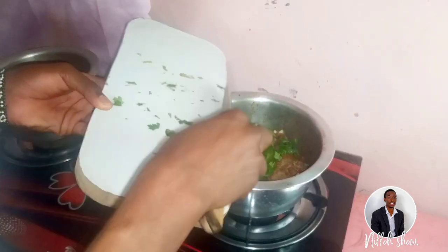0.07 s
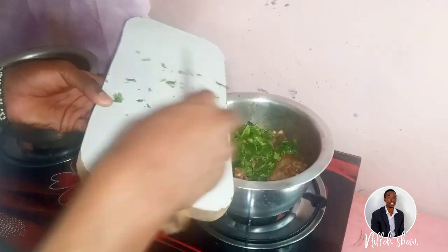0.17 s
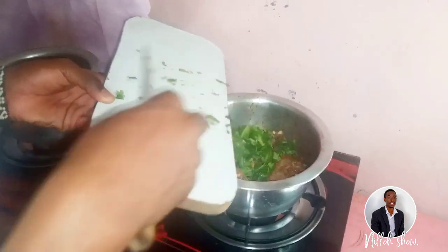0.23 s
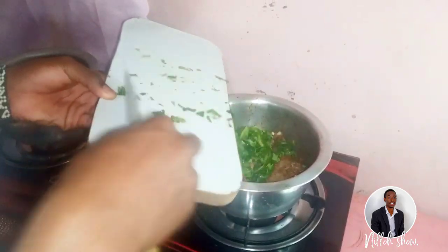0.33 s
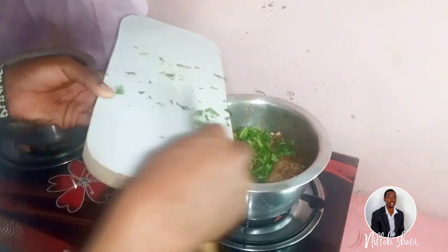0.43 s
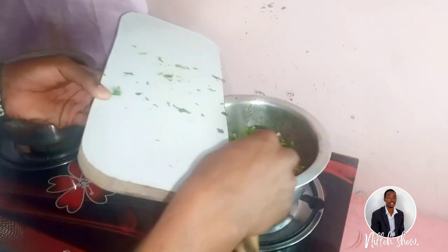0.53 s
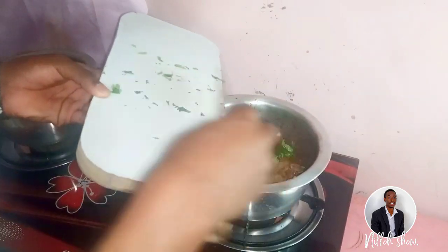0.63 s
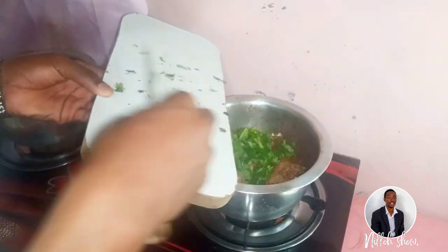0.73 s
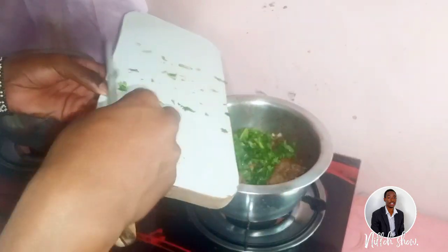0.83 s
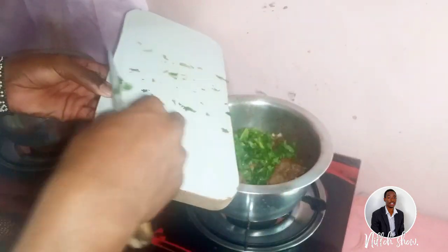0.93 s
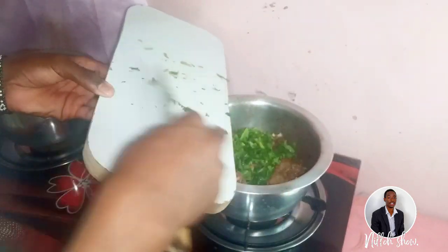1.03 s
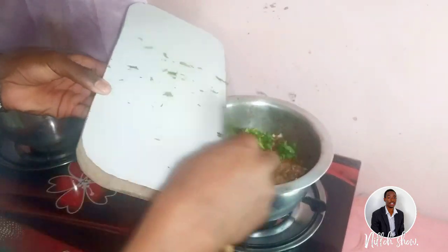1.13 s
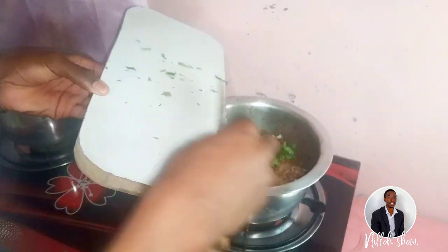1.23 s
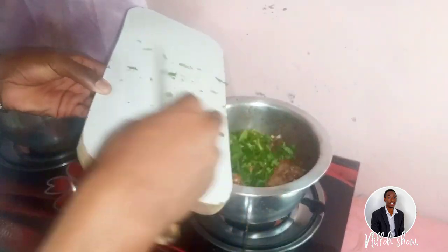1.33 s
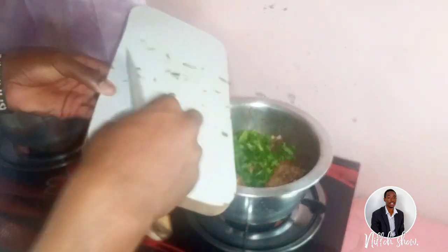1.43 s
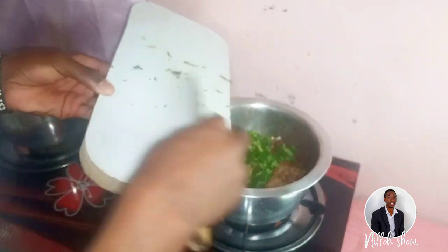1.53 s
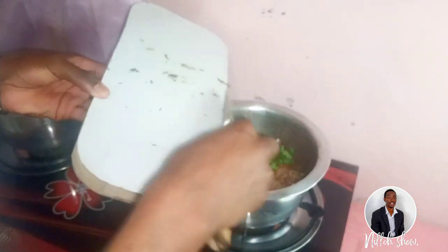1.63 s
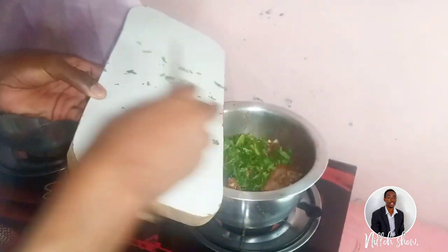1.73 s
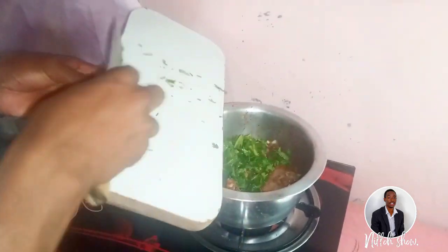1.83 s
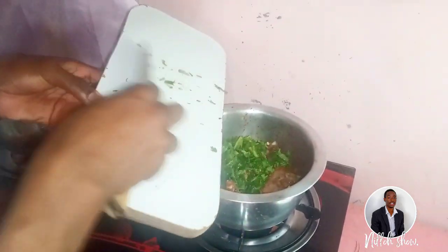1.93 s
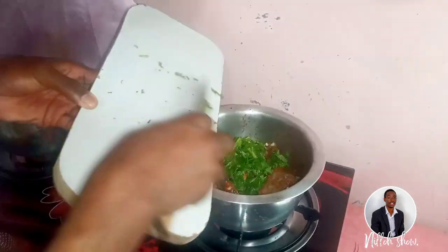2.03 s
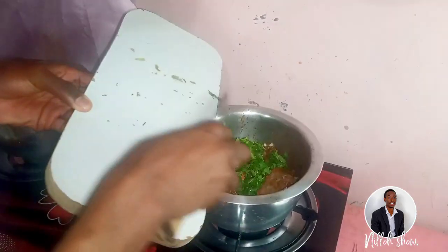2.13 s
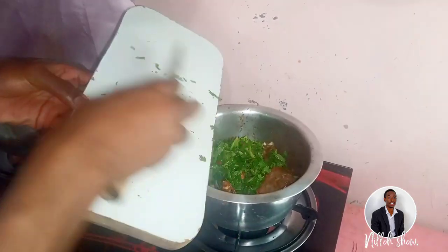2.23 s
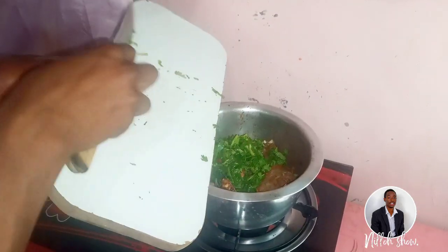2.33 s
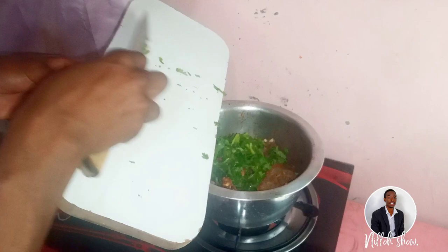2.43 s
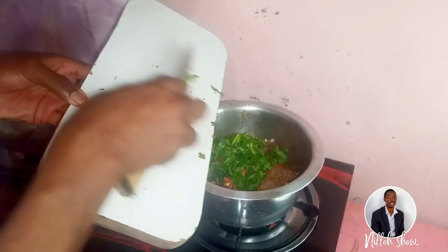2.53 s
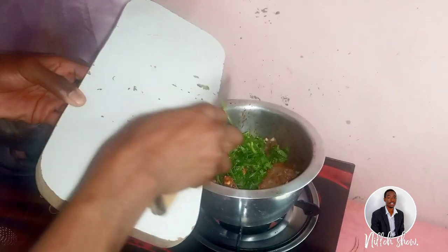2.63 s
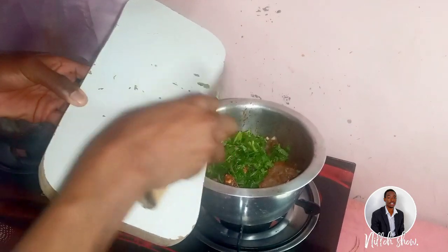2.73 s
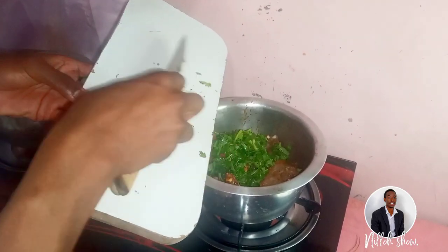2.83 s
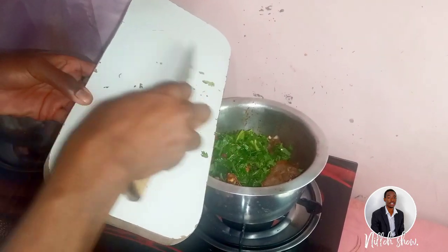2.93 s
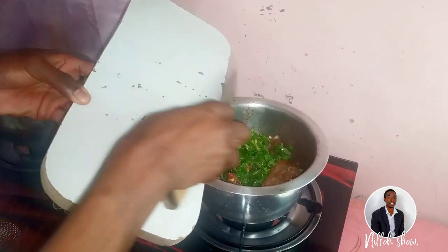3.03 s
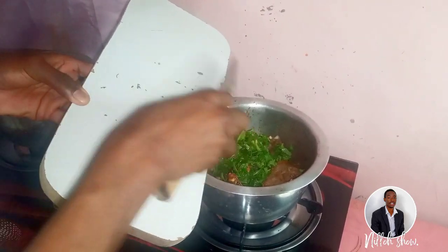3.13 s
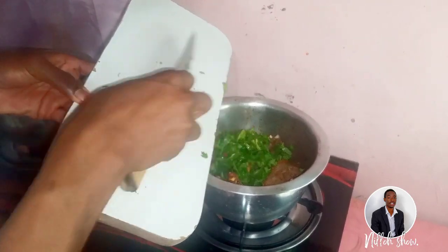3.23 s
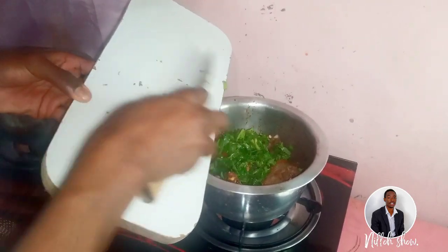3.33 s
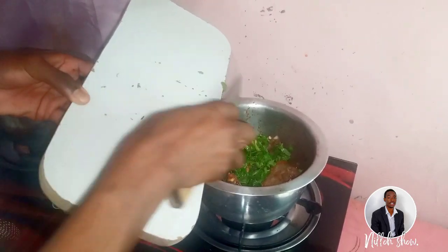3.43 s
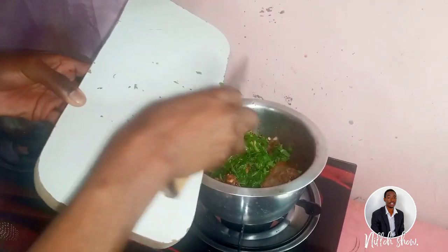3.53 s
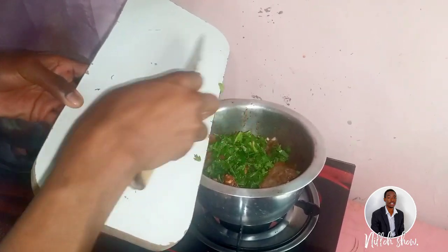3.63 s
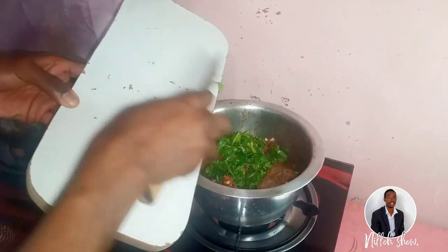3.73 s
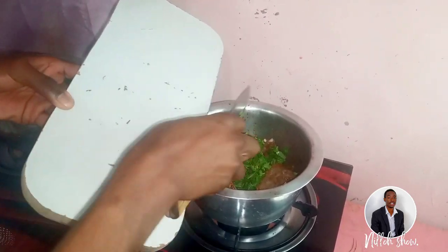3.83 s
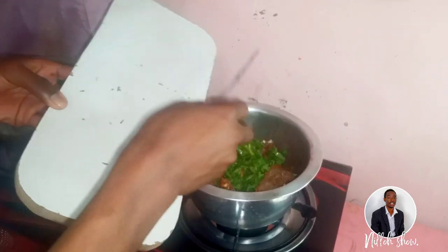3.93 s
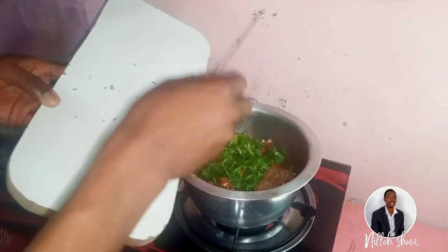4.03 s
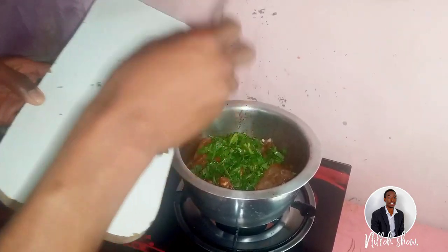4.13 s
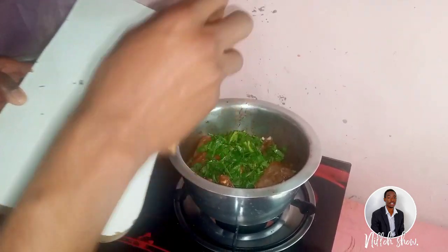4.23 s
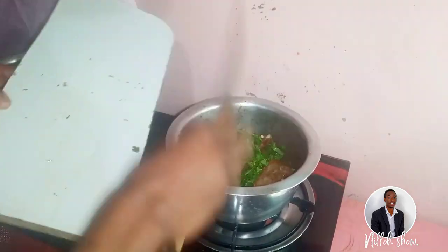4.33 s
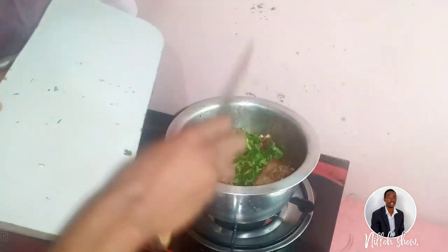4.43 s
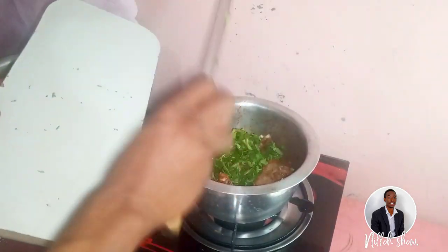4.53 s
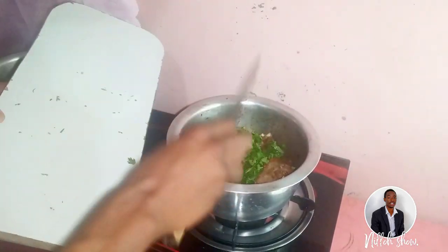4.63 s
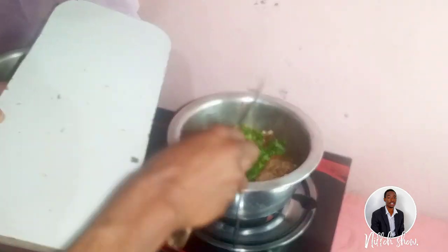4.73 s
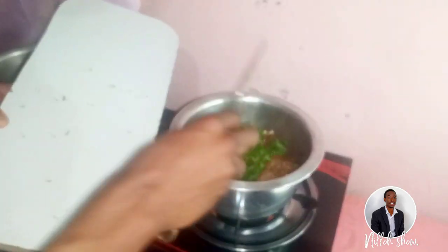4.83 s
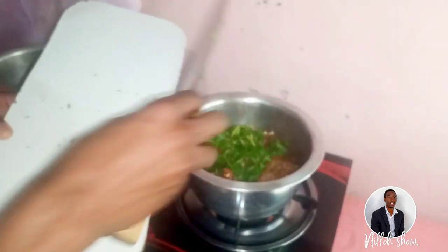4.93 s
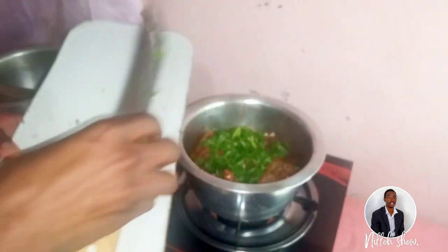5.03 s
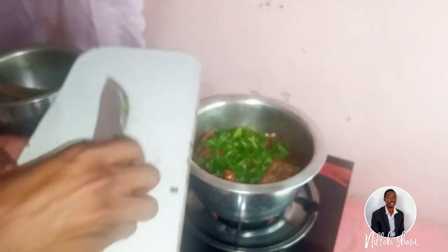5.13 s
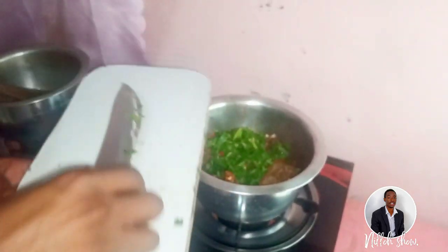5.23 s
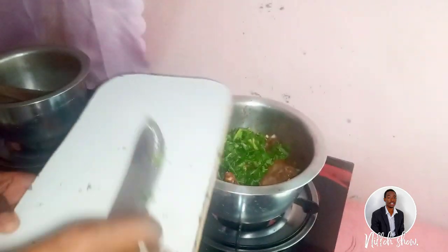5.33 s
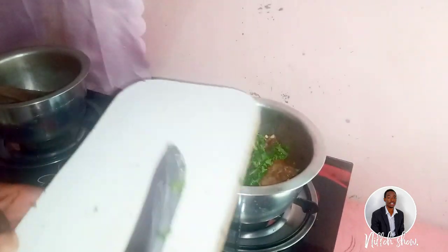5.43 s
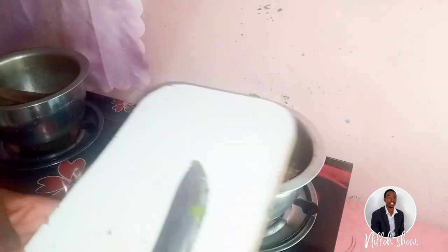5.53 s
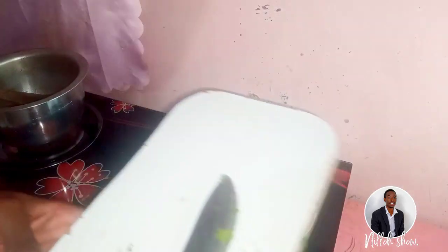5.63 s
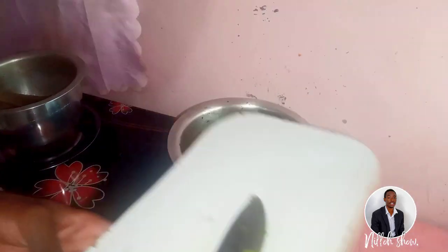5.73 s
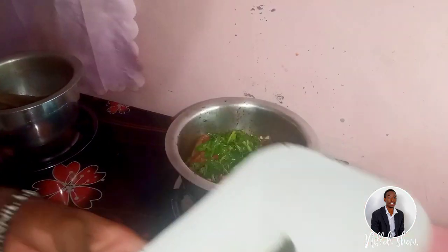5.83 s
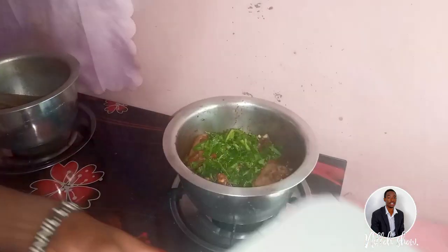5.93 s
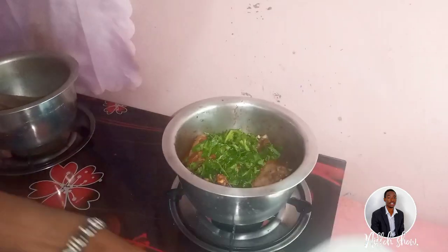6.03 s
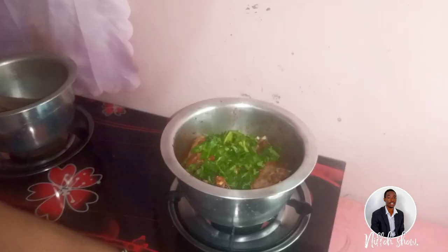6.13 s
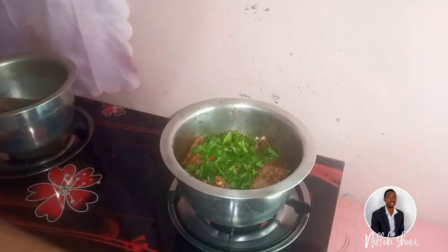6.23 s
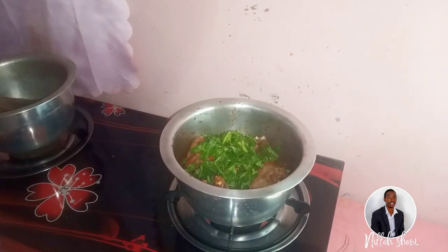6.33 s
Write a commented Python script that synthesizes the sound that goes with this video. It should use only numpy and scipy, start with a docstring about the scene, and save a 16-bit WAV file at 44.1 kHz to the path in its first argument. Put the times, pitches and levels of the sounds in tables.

```python
"""Knife scraping herbs off a chopping board

A knife lands on a plastic board eight times and scrapes herbs off it into a steel pot. Random slips of
the edge ring the board and blade; each landing is a crack, a short note and a low push.
The scrapes, landings and lift-offs also ring the pot. Later the flat blade claps on the board amid soft bumps.
A faint frying wash with pops runs throughout. A short room tail follows the knife, board and pot,
and a gain control turns loud moments down."""
import sys
import numpy as np
from scipy import signal
from scipy.fft import rfft
from scipy.io import wavfile
from scipy.ndimage import uniform_filter1d, map_coordinates

SR = 44100
rng = np.random.default_rng(int(sys.argv[2]) if len(sys.argv) > 2 else 0)


def file_out(sig):
    """Save sig as 16-bit WAV at sys.argv[1]."""
    # one column per channel
    cols = np.atleast_2d(sig).T
    # limit, then scale
    lim = np.clip(cols, -1, 1)
    pcm = np.round(lim * 32767).astype(np.int16)
    wavfile.write(sys.argv[1], SR, pcm)


N = 280917  # length of the scene in samples

# the blade slides over the board: (start [s], length [s], board rasp [dB], blade singing [dB],
# edge hiss [dB], edge whistle [dB], edge squeak [dB], ring of the freed blade [dB],
# hesitation at the start relative to the slowing at the end [ratio], fastest point [share of the length],
# pitch favoured by the contact point at the start [Hz], at the end [Hz])
STROKES = [(-0.1, 0.11, -41.5, -35, -39, -42, -51, -49, 1.3, 0.32, 1685, 1800),
           (0.386, 0.18, -31.5, -30.5, -33.5, -35, -52, -50, 1.73, 0.52, 1490, 2000),
           (0.9696, 0.21, -30.5, -29, -29.5, -37.5, -40, -38, 1.66, 0.62, 1660, 1740),
           (1.479, 0.15, -36.5, -27.5, -30, -37, -38, -34, 1.44, 0.41, 1960, 1730),
           (1.92, 0.17, -35.5, -31, -30.5, -37, -45, -45, 1.5, 0.66, 1890, 1840),
           (2.43, 0.25, -33.5, -29.5, -33.5, -44.5, -48.5, -38.5, 1.17, 0.52, 1540, 1740),
           (2.958, 0.12, -33, -29.5, -36.5, -48, -55, -47, 1.3, 0.76, 1570, 1670),
           (3.341, 0.1, -37.5, -37.5, -40, -45, -52, -50, 1.13, 0.97, 1500, 1420),
           (3.756, 0.037, -37, -39, -40, -52, -54, -47, 0.95, 1, 1580, 1870)]
# modes of the freely ringing board: (pitch [Hz], relative level [dB], t60 [s])
BOARD_MODES = [(233, 0, 0.2), (310.9, 2, 0.25), (439, -4, 0.046), (438, 4, 0.022), (450.5, -4.5, 0.15),
               (753, -6.5, 0.23), (788, 3, 0.15), (841.6, -6.5, 0.14), (895, -2.5, 0.16), (1013, 0, 0.09),
               (1080, -13, 0.14), (1257, -3, 0.12)]
# modes of the blade before further damping: (pitch [Hz], relative level [dB], t60 [s])
BLADE_MODES = [(1460, 0, 0.1), (1535, -8, 0.054), (1846, -8, 0.06), (1811, -0.5, 0.067), (1840, 0, 0.02),
               (2050, -7, 0.1), (2323, -4.5, 0.046), (2375, -12, 0.031), (2908, -3, 0.06)]
# thin ring of the edge: (pitch [Hz], relative level [dB], t60 [s])
EDGE_MODES = [(3610, 0.5, 0.019), (3900, -6, 0.029), (4170, -7, 0.014), (4864, -6, 0.06), (5230, -8, 0.014),
              (5590, -2, 0.022)]
# highest modes of the edge, which squeak under a hard stroke: (pitch [Hz], relative level [dB], t60 [s])
SQUEAK_MODES = [(10400, -3, 0.014), (10800, -1, 0.024), (11440, -6, 0.013)]
# spectrum of the board's rasp: (frequency [Hz], relative level [dB])
RASP_SPECTRUM = [(100, -67), (300, -19.5), (560, -29), (760, 1), (1050, 4), (1330, -17), (2000, -2),
                 (8000, -44)]
# spectrum of the blade's gritty sound: (frequency [Hz], relative level [dB])
GRIT_SPECTRUM = [(800, -44.5), (1330, -9), (1490, 8.5), (1670, -0.5), (1860, -4), (2150, -3), (2380, 1.5),
                 (2620, -14.5), (2950, 0), (3250, -4), (5000, -31.5), (8000, -55)]
# spectrum of the edge's hiss: (frequency [Hz], relative level [dB])
HISS_SPECTRUM = [(800, -34), (2000, -23), (2600, 0), (2950, 10.5), (3250, 2), (3650, 7), (3900, 7.5),
                 (4180, 7.5), (4800, 8), (5700, 7), (6130, 2.5), (6500, 3.5), (7200, -4), (9200, -5.5),
                 (10900, -7), (12500, -9), (15500, 0)]
# level change where a stroke is slow, compared with its fastest point (dB)
SLOW_BOARD_DB, SLOW_BLADE_DB, SLOW_HISS_DB, SLOW_WHISTLE_DB = 0.5, -4.5, -10.5, -17.5
BITE_S, LIFT_S = 0.0085, 0.022  # the edge bites, and lifts off at the end
CATCH_DB, CATCH_PER_S = 1.35, 45  # the edge catches and frees itself on cuts and herbs
SNAGS_PER_S, SNAG_DB = 260, -4  # coarse slips over old cuts, relative to the fine rasp
GLANCING_HZ = 650  # a glancing edge hardly bends the board: lower modes stay still
WHISTLE_HZ, WHISTLE_RING_S = 9650, 0.042  # the thin whistle of the edge
BOARD_DRIFT_S, BLADE_DRIFT_S = 0.00131, 0.000805  # typical time by which the cycles run ahead or behind
CROWD_DB = -4.0  # crowd of weak modes, relative to the main modes


def scrapes():
    """Clumped slips of the edge ring board and blade and hiss; each stroke speeds up, then slows down."""
    t, out = np.arange(N) / SR, np.zeros(N)
    path = []
    for s, length, *_, from_hz, to_hz in STROKES:
        path += [(s, from_hz), (s + length, to_hz)]
    favoured_hz = np.interp(t, *np.transpose(path))

    slips = steady(grains(per_s=4000, spread_db=2.2) * amp(2.2 * wander(per_s=300)))
    light = butter(slips, 890, "highpass", order=3)
    snags = steady(grains(per_s=SNAGS_PER_S, spread_db=1.5))
    dense = crowd_of_modes(slips) + amp(SNAG_DB) * snags

    # a glancing edge shortens the board's ring
    stiff = [(hz, db, 0.64 * t60) for hz, db, t60 in BOARD_MODES if hz > GLANCING_HZ]
    board_tones = drifting(rubbed(light, stiff, shift_db=3.5), BOARD_DRIFT_S)
    board = steady(board_tones + amp(CROWD_DB) * unit(through(dense, colour(RASP_SPECTRUM))))
    blade_tones = drifting(rubbed(light, BLADE_MODES, 1.9, favoured_hz), BLADE_DRIFT_S)
    blade = steady(blade_tones + amp(CROWD_DB) * unit(through(dense, colour(GRIT_SPECTRUM))))
    edge_tones = drifting(rubbed(light, EDGE_MODES, shift_db=5), BLADE_DRIFT_S)
    hiss = steady(unit(through(dense, colour(HISS_SPECTRUM))) + amp(-4.5) * edge_tones)

    # two resonances in a row make the whistle
    whistle = through(light, ring([(WHISTLE_HZ, 0, WHISTLE_RING_S)]))
    whistle = steady(through(whistle, ring([(WHISTLE_HZ, 0, WHISTLE_RING_S / 2)])))
    whistle = whistle * amp(5.5 * wander(per_s=40))
    squeak = steady(rubbed(butter(slips, 9000, "highpass", order=4), SQUEAK_MODES, shift_db=5))
    board, blade, hiss = (layer * amp(CATCH_DB * wander(per_s=CATCH_PER_S))
                          for layer in (board, blade, hiss))

    for (s, length, board_db, blade_db, hiss_db, whistle_db, squeak_db, _,
         hesitation, fastest, _, _) in STROKES:
        contact = np.interp(t - s, [0, BITE_S, length, length + LIFT_S], [0, 1, 1, 0])
        # 0 at the fastest point, rising towards both ends
        slow = np.interp(t - s, [0, fastest * length, length + LIFT_S], [-hesitation, 0, 1]) ** 2
        stroke = board * amp(board_db + SLOW_BOARD_DB * slow)
        stroke += blade * amp(blade_db + SLOW_BLADE_DB * slow)
        stroke += hiss * amp(hiss_db + SLOW_HISS_DB * slow)
        thin = whistle * amp(whistle_db) + squeak * amp(squeak_db)
        stroke += thin * amp(SLOW_WHISTLE_DB * slow)
        out += contact * stroke
    return out


PRESSED_RING = 0.89  # share of the given ring time left under the sliding edge


def rubbed(slips, modes, shift_db, favoured_hz=None):
    """The moving contact drives each mode now more, now less; those near the favoured pitch most."""
    out = np.zeros(N)
    for k, (hz, level_db, t60) in enumerate(modes):
        db = shift_db * wander(per_s=22)
        if favoured_hz is not None:
            db = db + 8 * np.exp(-((hz - favoured_hz) / 170) ** 2)
        mode = ring([(hz, level_db, PRESSED_RING * t60)])
        out += through(slips * amp(db), (-1) ** k * mode)  # every other mode is flipped
    return unit(out)


def crowd_of_modes(slips):
    """Three sets of dense echoes come and go, like many weak modes at different places on the blade."""
    crowd = slips
    for _ in range(3):
        presence = np.maximum(wander(per_s=18) + 0.78, 0)
        crowd = crowd + presence * through(slips, scatter(t60=0.078))
    return steady(patchy(drifting(crowd, BLADE_DRIFT_S), hz_wide=230, lasting_s=.04, depth_db=3.3))


def drifting(x, drift_s):
    """Bends all pitches slightly up and down by reading the sound a little early or late."""
    n = np.arange(N)
    return np.interp(n + drift_s * SR * wander(per_s=11), n, x)


def patchy(x, hz_wide, lasting_s, depth_db):
    """Short-lived resonances come and go at random pitches."""
    window, hop = 512, 128  # samples
    z = signal.stft(x, nperseg=window, noverlap=window - hop)[2]
    bins, frames = np.indices(z.shape)
    place = [bins * SR / window / hz_wide, frames * hop / SR / lasting_s]
    field = unit(map_coordinates(rng.standard_normal(z.shape), place, order=1, mode="nearest"))
    return signal.istft(z * amp(depth_db * field), nperseg=window, noverlap=window - hop)[1][:N]


# the edge digs in and chatters on one resonance: (middle [s], length [s], level [dB], pitch [Hz])
CHATTERS = [(.468, 0.073, -29, 831), (0.488, 0.039, -38.5, 4540), (0.561, 0.056, -33.5, 2030),
            (0.529, .08, -35, 2943), (0.56, .04, -33, 964), (1.058, 0.072, -35.5, 3610),
            (1.085, 0.065, -34, 2445), (1.089, 0.035, -27, 1830), (1.114, 0.059, -44, 5510),
            (1.168, 0.046, -28, 833), (1.171, 0.036, -27.5, 1861), (1.56, 0.12, -28, 1838),
            (1.621, 0.048, -29.5, 880.5), (1.636, 0.058, -29, 1457), (2.018, 0.12, -22, 1857),
            (2.001, 0.041, -31, 2956), (2.548, .04, -22.5, 1538), (2.585, 0.055, -25.5, 1470),
            (2.545, 0.061, -37, 3750), (2.659, 0.037, -27.5, 1830), (3.015, 0.081, -35, 1500),
            (3.065, 0.027, -42, 3610), (3.388, 0.028, -30, 1505), (3.782, .03, -34.5, 792)]


def chatters():
    """Where the edge digs in, quick slips keep one slightly unsteady resonance going for a moment."""
    out = np.zeros(N)
    t = np.arange(SR // 4) / SR
    for s, length, db, hz in CHATTERS:
        jitter = unit(uniform_filter1d(rng.standard_normal(len(t)), size=130))
        rough = amp(0.66 * unit(uniform_filter1d(rng.standard_normal(len(t)), size=130)))
        pitch_hz = hz + 1.42 * np.sqrt(hz) * jitter
        note = unit(rough * np.sin(2 * np.pi * np.cumsum(pitch_hz) / SR))
        swell = np.sin(np.pi * np.minimum(t / length, 1))
        add(out, s - length / 2, amp(db) * note * swell)
    return out


# the knife strikes the board: (time [s], crack [dB], treble shelf [dB], blade pitch [Hz],
# blade note [dB], its t60 [s], second note [Hz], second note [dB], board clack [dB], push into the board [dB])
LANDINGS = [(0.3898, 4, 8, 1965, -17.5, 0.046, 2894, -22, -20, -18.5),
            (0.9736, 4.5, -3.5, 1870, -27, 0.028, 4500, -25.5, -22, -18),
            (1.4835, 6.5, 6, 1820, -16.5, 0.04, 3675, -20, -46, -9),
            (1.925, 2.5, 0, 1934, -8.5, 0.015, 3460, -26, -42, -13),
            (2.4348, 6, -1, 1905, -11, 0.076, 4730, -22.5, -21, -7),
            (2.9594, 0.5, -6, 1800, -17, 0.04, 1490, -17.5, -37, -12),
            (3.3479, 0.5, -1, 1827, -16.5, 0.024, 2870, -22, -28.5, -10),
            (3.722, -10, -3, 1507, -19, 0.032, 1810, -24.5, -20.5, -13)]
# the blade skips or rattles and touches again lightly: (time [s], level [dB], treble shelf [dB])
SKIPS = [(0.4025, -6, 11), (1.179, -4, -1), (1.499, -8, 9), (2.033, -8, -5), (3.073, -19, 8),
         (3.743, -17, 22), (3.849, -18.5, 17), (3.889, -28, 12), (5.436, -25, -2), (5.451, -18, 6)]
# spectrum of a dull push or thud: (frequency [Hz], relative level [dB])
THUD_SPECTRUM = [(60, -4), (150, -10), (228, 0.5), (268, -7.5), (310, 2.5), (445, 7.5), (520, 3),
                 (620, -4.5), (800, -0.5), (1200, -1), (3000, -4), (8000, -39)]
TICK_DB, BLADE_RING_DB, EDGE_RING_DB = -32, -49, -58  # relative to the crack; the shelf also lifts the edge
NOTE_LAG_S, PUSH_LAG_S = .0006, 0.0092  # the note and the push start after the crack


def landings():
    """The knife comes down: a crack, a brief note of the pressed blade, and a push that bends the board."""
    out = np.zeros(N)
    clack = damped(butter(ring(BOARD_MODES), 830, "highpass", order=6), t60=0.15)
    tick = butter(signal.unit_impulse(256), 11000, "highpass", order=4)  # the instant of first contact
    for (s, db, treble_db, hz, note_db, note_t60, second_hz, second_db,
         clack_db, push_db) in LANDINGS:
        note = ring([(hz, note_db, note_t60), (second_hz, second_db, .028)])
        # a new spot each time changes the balance of the modes
        board = ring([(f, level + 2 * rng.standard_normal(), t60) for f, level, t60 in BOARD_MODES])
        bend = unit(through(scatter(t60=0.23), colour(THUD_SPECTRUM)))
        bend += amp(2.0) * unit(board[:len(bend)])
        bend = butter(butter(bend, 490, "lowpass", order=4), 250, "highpass", order=8)
        add(out, s, amp(db) * crack(treble_db))
        add(out, s, amp(db + TICK_DB) * tick)
        add(out, s + NOTE_LAG_S, butter(note, 1150, "highpass"))
        add(out, s, amp(clack_db) * clack / abs(clack).max())
        add(out, s, amp(db + BLADE_RING_DB) * damped(ring(BLADE_MODES), t60=0.17))
        add(out, s, amp(db + treble_db + EDGE_RING_DB) * ring(EDGE_MODES))
        add(out, s + PUSH_LAG_S, amp(push_db) * bend / np.linalg.norm(bend))
    for s, db, treble_db in SKIPS:
        add(out, s, amp(db) * crack(treble_db))
    return out


# spectrum of steel hitting plastic: (frequency [Hz], relative level [dB])
TICK_SPECTRUM = [(150, -26.5), (600, -35), (790, 4), (1000, 5.5), (1200, 10), (1370, -19), (1500, -6),
                 (1700, 9), (1880, 14.5), (2050, 14), (2190, 11.5), (2380, 2.5), (2900, 2), (3100, -14),
                 (3550, -0.5), (3850, 1), (4150, -13.5), (4900, -7.5), (5700, -6.5), (6150, -15),
                 (8000, -13), (15500, -17.5)]
BOUNCE_S, BOUNCE_DB = 0.0011, -8.5  # a landing edge strikes again almost at once


def crack(treble_db):
    """Steel meets plastic: a sharp contact, a quick bounce and a short scatter, with energy 1."""
    contacts = scatter(t60=0.084)
    contacts[0] = .9
    add(contacts, BOUNCE_S, amp([BOUNCE_DB]))
    sound = through(contacts, colour(TICK_SPECTRUM, treble_db=treble_db))
    return sound / np.linalg.norm(sound)


# blade off the board, before a small random change: (pitch [Hz], relative level [dB], t60 [s])
FREE_BLADE_MODES = [(1410, -7, 0.39), (1510, -12, 0.17), (1770, 8, 0.25), (2420, -7, 0.34), (2870, 3, 0.2),
                    (2980, -21, .18)]


def lift_offs():
    """Freed from the board at the end of each stroke, the blade rings on in a few thin tones."""
    out = np.zeros(N)
    for s, length, _, _, _, _, ring_db, *_ in STROKES:
        modes = [(hz * (1 + 0.0117 * rng.standard_normal()), db + 2 * rng.standard_normal(), t60)
                 for hz, db, t60 in FREE_BLADE_MODES]
        note = ring(modes)
        fade_in = np.minimum(np.arange(len(note)) / SR / LIFT_S, 1)
        add(out, s + length - LIFT_S, amp(ring_db) * note * fade_in)
    return out


# the steel pot under the board's edge: (pitch [Hz], relative level [dB], t60 [s])
POT_MODES = [(780, -2.5, 0.16), (920, -18, 0.22), (1470, -9, 0.22), (1760, -5, 0.12)]


def pot(x):
    """The board rests on the rim and passes its shaking to the pot, which rings on faintly."""
    response = butter(ring(POT_MODES), 550, "highpass")
    return amp(-1.0) * through(x, response / abs(rfft(response)).max())


# blade and board pressed flat together: (pitch [Hz], relative level [dB], t60 [s])
PRESSED_MODES = [(456, -0.5, 0.04), (940, -3.5, 0.011), (1050, -29, 0.03), (1287, -15, 0.088),
                 (1885, -13, 0.048), (1843, -5, 0.063), (2280, -20, 0.1), (2940, -15.5, 0.042),
                 (3410, -12, 0.034), (4100, -30, 0.045), (5430, -25, 0.03), (6320, -9, 0.017)]
CLAP_S, CLAP_DB = 5.4175, -14
SETTLE_S, SETTLE_DB, SETTLE_HZ = 0.00266, -18.5, 1875  # the blade lands tip first, then lies flat


def clap():
    """The flat of the blade slaps the board: a hard clack that the grip damps quickly."""
    out = np.zeros(N)
    slap = through(scatter(t60=0.066), colour(TICK_SPECTRUM, treble_db=12))
    clack = sum((-1) ** (k // 2) * ring([mode]) for k, mode in enumerate(PRESSED_MODES))
    add(out, CLAP_S, amp(CLAP_DB) * clack)
    add(out, CLAP_S + SETTLE_S, amp(SETTLE_DB) * ring([(SETTLE_HZ, 0, .028)]))
    add(out, CLAP_S, amp(CLAP_DB + 5.5) * slap / np.linalg.norm(slap))
    add(out, CLAP_S, amp(CLAP_DB + 11.0) * butter(scatter(t60=0.94), 3300, "highpass"))
    add(out, CLAP_S, amp(CLAP_DB - 32) * ring(EDGE_MODES))
    return butter(out, 227, "highpass", order=3)


# soft bumps of the board: (time [s], level [dB], dullness corner [Hz], t60 of the thud [s], ring of the pot [dB])
BUMPS = [(3.815, 0, 625, 0.16, -41), (3.885, -20, 500, 0.15, -58), (5.418, -0.5, 1100, 0.1, -32),
         (5.450, -6, 800, 0.088, -37), (5.515, -7, 650, 0.055, -37), (5.539, -9, 1200, 0.13, -42),
         (5.549, -9.5, 1100, 0.12, -34), (5.566, -21, 900, 0.1, -40), (5.612, -24.5, 300, 0.14, -65),
         (5.69, -28, 330, 0.25, -83), (5.82, -34, 140, 0.25, -83), (5.910, -31.5, 180, 0.25, -84)]
REBOUND_S, REBOUND_DB = .016, -16  # rough spacing and level step of the rebounds


def bumps():
    """Blunt contacts thud, stir the low modes of the firmly held board, rebound twice and ring the pot."""
    out = np.zeros(N)
    for s, db, corner_hz, t60, pot_db in BUMPS:
        add(out, s, amp(pot_db) * damped(ring(POT_MODES[:1]), t60=0.97))
        board = damped(ring(BOARD_MODES), t60=2 * t60)
        for k in range(3):
            thud = through(scatter(t60), colour(THUD_SPECTRUM))
            knock = butter(board, 216, "highpass") / np.linalg.norm(board)
            add(knock, 0, amp(7.5) * thud / np.linalg.norm(thud))
            # the whole board flexes briefly
            add(knock, 0, amp(-18.5) * ring([(453, 1.5, 0.056), (315, -4, 0.064)]))
            knock = butter(butter(knock, corner_hz, "lowpass"), 84, "highpass")
            knock = knock / np.linalg.norm(knock)
            lag_s = k * REBOUND_S * rng.uniform(0.613, 1.1)
            add(out, s + lag_s, amp(db + k * REBOUND_DB) * knock)
    return out


# spectrum of the frying: (frequency [Hz], relative level [dB])
SIZZLE_SPECTRUM = [(25, -33), (55, -12), (100, 12), (200, -1), (370, -4), (600, -11.5), (850, -7),
                   (1200, -10.5), (1530, -1.5), (2050, -5), (2900, -14.5), (4300, -3.5), (8000, -9),
                   (15500, -5)]
# single pops in the pot: (time [s], level of the tone [dB], pitch [Hz], t60 of the tone [s])
POPS = [(0.713, -49, 3250, 0.014), (1.357, -46, 3010, 0.092), (1.446, -48, 5360, 0.035),
        (1.757, -47.5, 3620, 0.073), (2.344, -43.5, 4500, 0.039), (2.79, -39, 3570, 0.052),
        (3.971, -44.5, 4230, 0.013), (4.124, -43, 4770, .012), (4.295, -41, 5140, 0.028),
        (4.854, -47, 4370, .012), (4.887, -41, 4780, 0.014), (4.921, -45, 1770, 0.032),
        (5.934, -37, 4500, 0.0049), (6.104, -40.5, 4720, 0.0062)]
SIZZLE_DB = -52  # the wash without the single pops


def sizzle():
    """A soft, even frying wash with tiny ringing bubbles of many pitches, and a few single pops."""
    fizz = unit(rng.standard_normal(N) * amp(.5 * wander(per_s=21)))
    bubbles = np.zeros(N)
    for hz in np.geomspace(1450, 6200, 14):
        bubble = butter(ring([(hz, 0, .012)]), 920, "highpass")
        bubbles += through(grains(per_s=55, spread_db=2.5), bubble)
    spits = butter(grains(per_s=500, spread_db=4.5), 3200, "highpass")
    wash = fizz + amp(-9.5) * unit(bubbles) + amp(-3.5) * spits
    out = amp(SIZZLE_DB) * unit(through(wash, colour(SIZZLE_SPECTRUM)))
    for s, db, hz, t60 in POPS:
        snap = through(scatter(t60=0.072), colour(SIZZLE_SPECTRUM))
        add(out, s, amp(db) * ring([(hz, 0, t60)]))
        add(out, s, amp(db + 15.5) * snap / np.linalg.norm(snap))
    return out


# how fast the room's tail dies: (frequency [Hz], t60 [s])
ROOM_T60 = [(150, 0.2949), (400, 0.0837), (900, 0.35), (1700, 0.1355), (3500, 0.2362), (6000, 0.07),
            (15000, 0.21)]
# colour added to the room's tail: (frequency [Hz], relative level [dB])
ROOM_SPECTRUM = [(300, 1), (800, -11), (1600, -8), (3000, -8), (8000, -2.5)]


def kitchen(x):
    """Hard walls: a short tail in which each band has its own strength and dies at its own speed."""
    hz, t, z = signal.stft(rng.standard_normal(SR // 2), SR, nperseg=256)
    decay = np.exp(-np.log(1000) * t / read(ROOM_T60, hz)[:, None])
    tail = signal.istft(z * decay, SR, nperseg=256)[1]
    tail *= np.clip((np.arange(len(tail)) / SR - .003) / 0.0054, 0, 1)  # silent for 3 ms, then builds up
    return through(x, through(tail / np.linalg.norm(tail), colour(ROOM_SPECTRUM)))


def amp(db):
    """Decibels to gain."""
    return 10 ** (np.asarray(db) / 20)


def unit(x):
    """Scales to rms 1."""
    return x / np.sqrt(np.mean(x ** 2) + 1e-20)


def steady(x):
    """Evens out slow swells."""
    return x / np.sqrt(abs(uniform_filter1d(x ** 2, size=1500)) + 1e-12)


def damped(x, t60):
    """Shortens a ring, as a hand or a pressed blade does."""
    return x * np.exp(-np.log(1000) * np.arange(len(x)) / SR / t60)


def read(points, hz):
    """Reads a table on a log-frequency axis."""
    f, value = np.transpose(points)
    return np.interp(np.log(hz + 1), np.log(f), value)


def add(mix, s, sound):
    """Mixes a sound in at time s."""
    part = mix[max(round(s * SR), 0):][:len(sound)]
    part += sound[:len(part)]


def through(x, response):
    """Passes x through an impulse response."""
    return signal.oaconvolve(x, response)[:len(x)]


def butter(x, hz, kind, order=2):
    """Low-pass or high-pass."""
    return signal.sosfilt(signal.butter(order, min(hz, SR / 2 - 1), kind, fs=SR, output="sos"), x)


def colour(points, treble_db=0):
    """The shortest causal click with this spectrum, with a shelf on the treble."""
    hz = abs(np.fft.fftfreq(4096, 1 / SR))
    shelf_db = treble_db * read([(2000, 0), (4200, 1)], hz)
    log_gain = np.log(amp(read(points, hz) + shelf_db))
    return np.fft.ifft(np.exp(np.conj(signal.hilbert(log_gain)))).real[:len(hz) // 2]


def ring(modes):
    """Damped modes after one sharp blow."""
    t = np.arange(SR // 2) / SR
    return sum(amp(db) * np.exp(-np.log(1000) * t / t60) * np.sin(2 * np.pi * hz * t)
               for hz, db, t60 in modes)


def scatter(t60):
    """A short burst of dense echoes with energy 1."""
    t = np.arange(SR // 4) / SR
    burst = rng.choice([-1., 1.], len(t)) * np.exp(-np.log(1000) * t / t60)
    return burst / np.linalg.norm(burst)


def grains(per_s, spread_db):
    """Random clicks, most small and a few large."""
    size = amp(spread_db * np.minimum(rng.exponential(1, N), 4))
    return unit(size * rng.standard_normal(N) * (rng.random(N) < per_s / SR))


def wander(per_s):
    """Smooth chance with rms 1."""
    knots = rng.standard_normal(N)
    return unit(np.interp(np.arange(N) * per_s / SR, np.arange(N), knots))


def scene():
    """All sources, heard from close by in the kitchen."""
    knife = scrapes() + chatters() + landings() + lift_offs()
    work = knife + pot(knife) + clap() + bumps()
    return (work + amp(-1.5) * kitchen(work) + sizzle())[None]


LIMIT_DB, SQUEEZE = -46.5, 0.26  # threshold, and share of the excess removed
REACT_S, RECOVER_DB_PER_S = 0.12, 22  # reaction time, and fall of the held level
HELD_AT_START_DB = -32  # the gain is already down from the scraping


def gain_control(x):
    """Follows the level, turns loud moments down and comes back slowly."""
    power = butter(x ** 2, 1 / (2 * np.pi * REACT_S), "lowpass", order=1)
    power_db = 10 * np.log10(power + 1e-12)
    fall = RECOVER_DB_PER_S * np.arange(N) / SR
    held_db = np.maximum.accumulate(np.maximum(power_db + fall, HELD_AT_START_DB)) - fall
    return x * amp(-SQUEEZE * np.maximum(held_db - LIMIT_DB, 0))


# the microphone thins the bass and has a deep notch in the treble: (frequency [Hz], level [dB])
MIC_SPECTRUM = [(35, -18.5), (100, -20.5), (200, -11), (300, -7), (5600, -1.5), (6300, -5), (7000, -15),
                (8000, -25.5), (9200, -23), (10700, -15), (13500, -16), (14700, -12), (15600, -9.5)]
CUT_HZ = 15750  # upper band limit


def record(dry):
    """The microphone's colour, gain control and band limit."""
    heard = gain_control(through(dry[0], colour(MIC_SPECTRUM)))
    band_limit = signal.firwin(511, CUT_HZ, window=("kaiser", 9), fs=SR)
    return signal.oaconvolve(heard, band_limit, "same")[None]


dry = scene()
out = record(dry)
file_out(out)
```